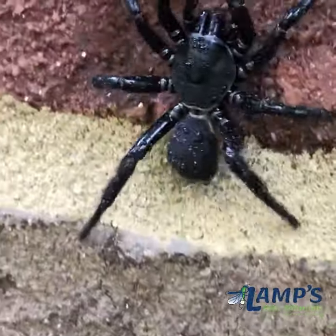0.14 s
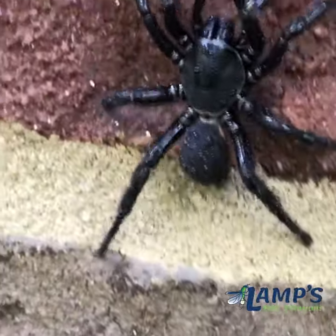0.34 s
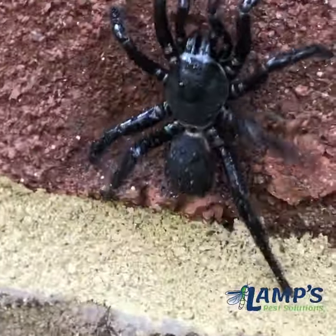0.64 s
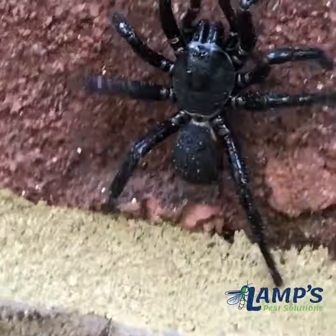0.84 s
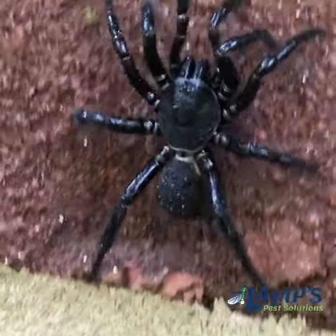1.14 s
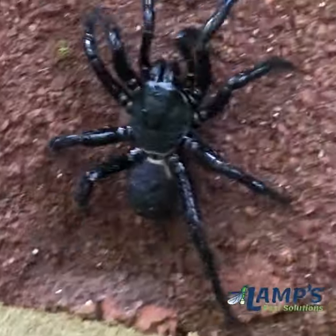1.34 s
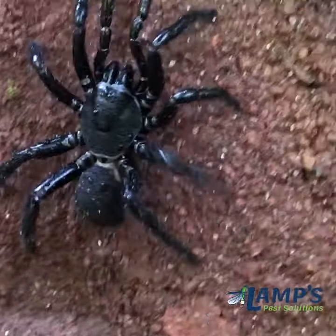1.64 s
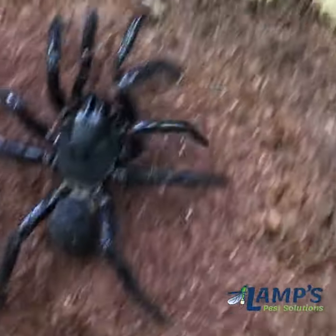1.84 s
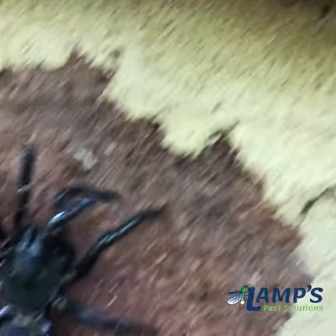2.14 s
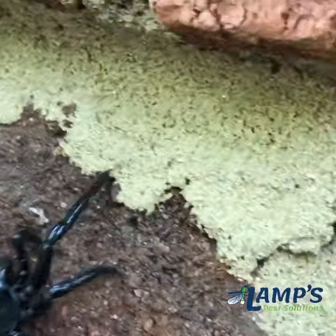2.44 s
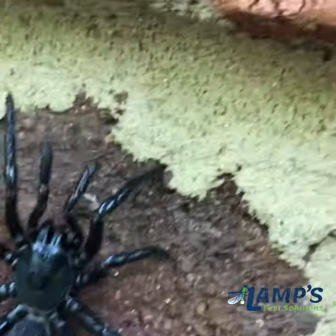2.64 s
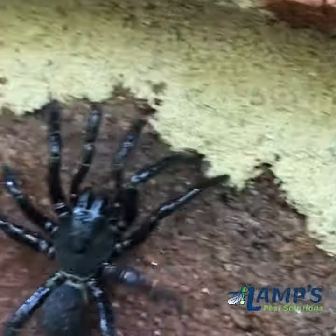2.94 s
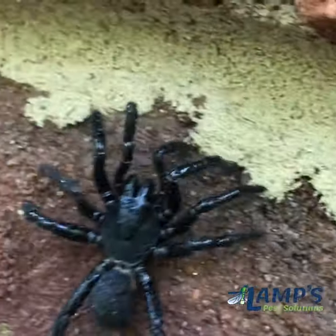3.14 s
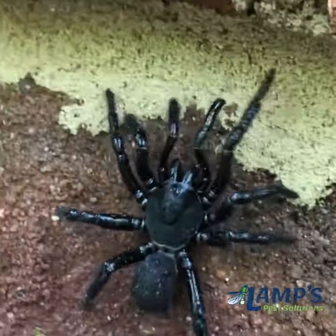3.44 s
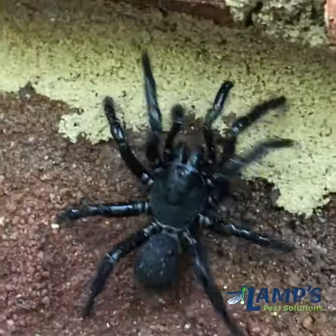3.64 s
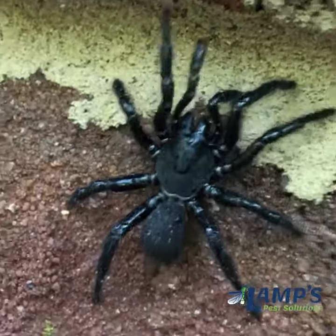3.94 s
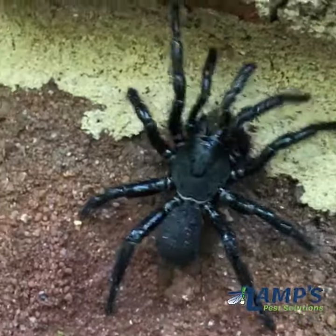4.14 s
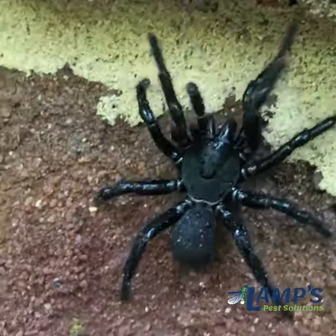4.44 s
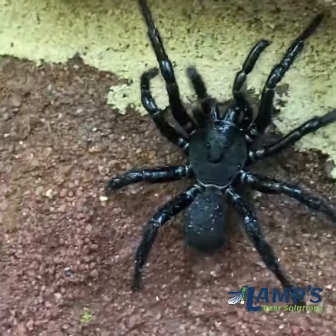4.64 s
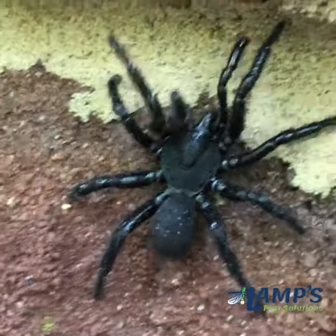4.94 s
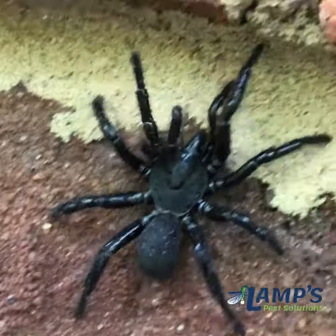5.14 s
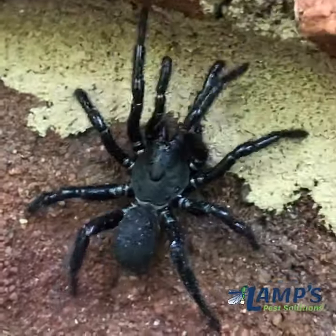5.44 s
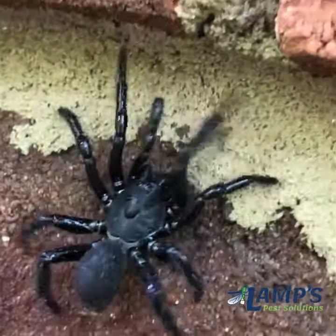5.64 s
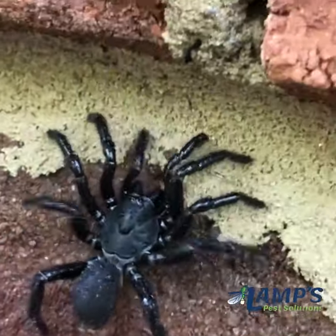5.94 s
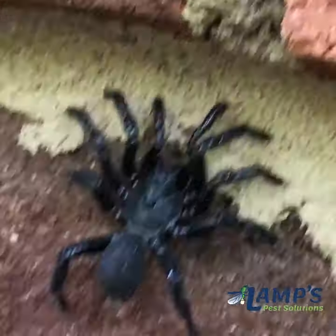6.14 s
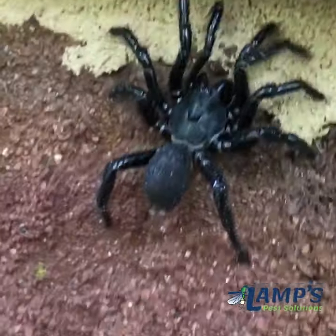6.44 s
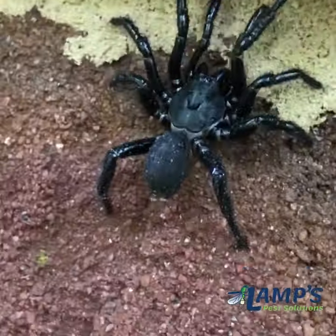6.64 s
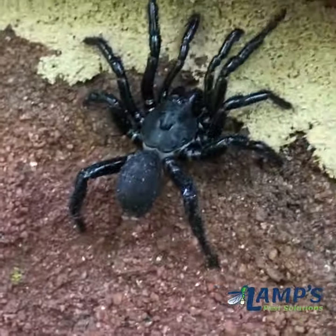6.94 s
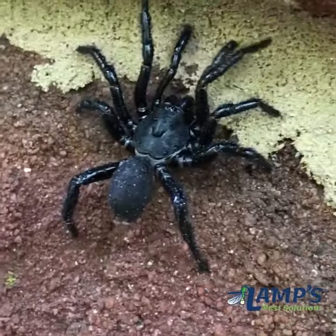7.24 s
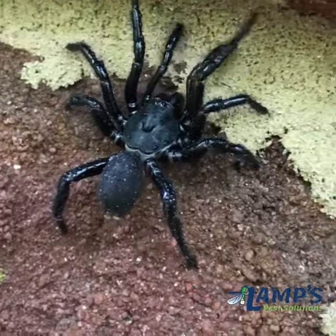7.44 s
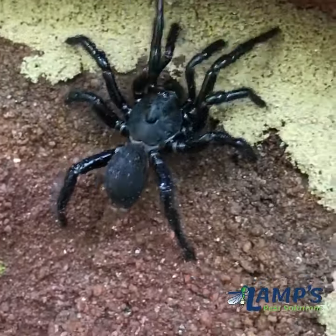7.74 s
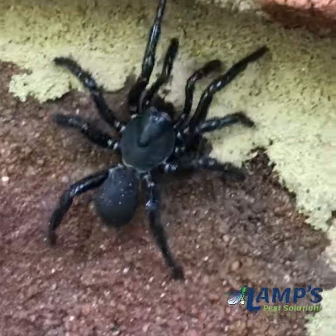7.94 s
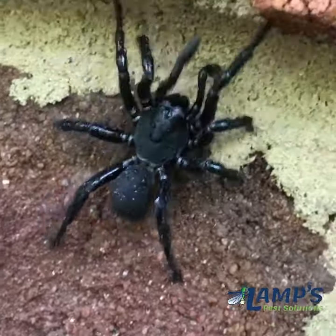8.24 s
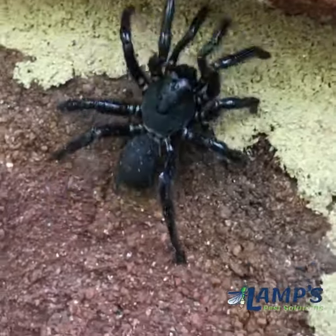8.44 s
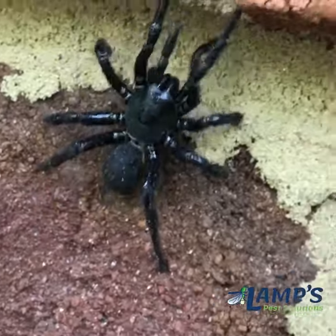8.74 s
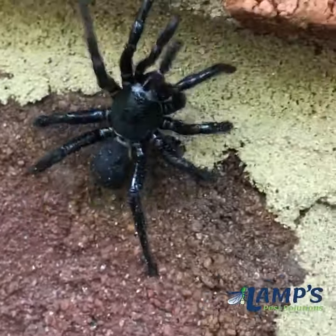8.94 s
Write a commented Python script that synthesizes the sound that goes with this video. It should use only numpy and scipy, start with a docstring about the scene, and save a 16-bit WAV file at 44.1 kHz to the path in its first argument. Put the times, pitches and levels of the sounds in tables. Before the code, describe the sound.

A low, steady engine drone is heard outdoors from beside a brick wall, coming from a vehicle on a nearby road. It is strongest in the first two seconds, with one very faint bird chirp at about 1.2 seconds. From 2 seconds, tyre noise swells as the vehicle nears, peaking between 3 and 4 seconds and ringing slightly in the space by the wall. A small bird gives a quick cluster of thin, high chirps from 3.5 to 4 seconds, and a fainter one at 4.5. At about 5 seconds the engine briefly dips as the load comes off, then continues softer and more uneven. From 6 seconds it falls steadily in pitch, fading with the tyre noise by about 9 seconds. A weaker motor hums farther off, most noticeable late on. Low road rumble and a thin outdoor hiss continue throughout.

```python
"""A motor drones some way from a brick wall outdoors, probably a vehicle on a nearby road.
Its exhaust hums at the firing rate and its multiples, then the load drops and it runs down.
Tyre noise swells as it nears, rings the space by the wall, then sinks and fades.
A weaker motor hums farther off and a small bird gives thin, high chirps over low rumble and hiss."""
import sys
import numpy as np
from scipy import signal
from scipy.fft import rfft, irfft, next_fast_len
from scipy.io import wavfile
from scipy.ndimage import uniform_filter1d, map_coordinates

SR = 44100
rng = np.random.default_rng(int(sys.argv[2]) if len(sys.argv) > 2 else 0)


def master_out(mix):
    """Clip the mix to full scale and print it as 16-bit PCM to the path in sys.argv[1]."""
    frames = np.transpose(np.atleast_2d(mix))
    ceiling = np.clip(frames, -1, 1)
    pcm = np.round(ceiling * 32767).astype(np.int16)
    wavfile.write(sys.argv[1], SR, pcm)


N = 401310

CRUISE_HZ = 85.1  # firing rate on the approach
LIFT_S, BRAKE_S = 4.95, 6.06  # load comes off, braking starts
PAST_S, PAST_TAKES_S = 4.4, 0.7  # tyres turn to be heard from behind


def exhaust(octave_early_db=-35, octave_late_db=-43.5, stumble_db=2.0, jitter_rad=0.13):
    """Firing tone and its orders: even while the motor pulls, weaker and uneven as it runs down."""
    # Each row: time in seconds, firing tone level in dB.
    firing_levels = [(0.0, -28.5), (1.85, -29.5), (2.95, -34.5), (3.4, -40), (3.9, -33), (4.91, -31.0),
                     (4.98, -51), (5.35, -37.5), (6.1, -36), (7.3, -38), (8.3, -44.5), (9.1, -55)]
    # Each row: multiple of the firing rate, base level in dB on the approach, in dB once settled.
    upper_orders = [(3, -65.5, -61), (4, -63, -58), (5, -61, -63), (6, -69.5, -74), (7, -66.5, -65.5),
                    (8, -67, -68.5), (9, -66, -74), (10, -65, -76), (11, -64, -75), (12, -64.5, -76.5)]
    (drone_db,) = curves(firing_levels)
    coasting = ramp(LIFT_S, takes_s=0.056)
    settled = ramp(1.79, takes_s=0.76)
    # overtones drop off load, return a little under braking, fade with speed
    unloaded_db = -14 * coasting + 3.5 * ramp(BRAKE_S, takes_s=0.45) - 6 * speed_halvings()
    firing_rad = phase_of(firing_hz()) + (0.048 + jitter_rad * coasting / 2) * wobble(19)
    hum = amp(drone_db + (0.28 + coasting / 2) * wobble(15)) * np.cos(firing_rad)
    octave_db = octave_early_db + (octave_late_db - octave_early_db) * settled
    octave_db += (0.5 + stumble_db * coasting) * wobble(11)
    octave_rad = 2 * firing_rad + np.pi + 2 * jitter_rad * coasting * wobble(10)
    hum += amp(octave_db + unloaded_db) * np.cos(octave_rad)
    upper_db = unloaded_db + 0.96 * (1 - coasting) * (drone_db - drone_db.max())
    for order, early_db, late_db in upper_orders:
        # open air makes each order drift in level and phase
        db = early_db + (late_db - early_db) * settled + upper_db + 2.3 * wobble(3)
        drift_rad = 0.06 * order * wobble(12) + rng.uniform(0, 2 * np.pi)
        hum += amp(db) * np.cos(order * firing_rad + drift_rad)
    return np.sqrt(2) * hum


def firing_hz(sag_hz=1.6, coast_hz_per_s=4.0, brake_hz_per_s=10.6):
    """Cruise, a slight sag in passing, a gentle coast, then steady braking."""
    t = np.arange(N) / SR
    coasted_hz = coast_hz_per_s * (np.clip(t, LIFT_S, BRAKE_S) - LIFT_S)
    braked_hz = brake_hz_per_s * np.maximum(t - BRAKE_S, 0)
    return CRUISE_HZ - sag_hz * ramp(3.0, takes_s=0.9) - coasted_hz - braked_hz


def speed_halvings():
    """How many times the speed has halved since cruise."""
    return np.log2(CRUISE_HZ / firing_hz())


def road_db(base_db, swell_db_per_db, past_db, db_per_halving):
    """Level of a road layer from nearness, direction and speed."""
    # Tyre rush, swelling as the vehicle nears. Each row: time in seconds, relative level in dB.
    rush_levels = [(0.0, -51), (0.9, -51.5), (2.05, -48.5), (2.6, -45), (3.1, -45.0), (3.35, -40.5),
                   (3.6, -47.5), (3.85, -44), (4.45, -48), (6.2, -50.5), (7.7, -53), (9.1, -60)]
    (rush_db,) = curves(rush_levels)
    swell_db = swell_db_per_db * (rush_db - rush_db.mean())
    return base_db + swell_db + past_db * ramp(PAST_S, PAST_TAKES_S) + db_per_halving * speed_halvings()


def tyre_tread(approach_hz=1510.5, past_ratio=0.88, width_hz=195):
    """Tread resonance: a noise band whose pitch falls in passing and follows the speed."""
    centre_hz = approach_hz * past_ratio ** ramp(PAST_S, PAST_TAKES_S)
    centre_hz *= (firing_hz() / CRUISE_HZ) ** 0.65
    centre_rad = phase_of(centre_hz)
    skirt = lambda hz: (1 + (hz / width_hz) ** 2) ** -0.79
    in_phase, quadrature = (filtered(rng.standard_normal(N), skirt) for _ in range(2))
    band = patchy(in_phase * np.cos(centre_rad) + quadrature * np.sin(centre_rad), depth_db=2.0)
    db = road_db(-53.5, swell_db_per_db=1.28, past_db=1, db_per_halving=3)
    far_db = -8.5 * (1 - ramp(0.9, takes_s=0.66))  # sings only once closer
    return amp(db + far_db + 0.46 * wobble(8)) * band


def tyre_rush():
    """Tyres rolling on the road: a broad roar and a higher hiss."""
    # Each row of both spectra: frequency in Hz, relative density in dB.
    roar_spectrum = [(100, -15), (250, -4), (450, -7), (620, 0.5), (1000, 1), (1500, 2), (2000, -8),
                     (2500, -13), (3100, -24.5), (3600, -18.5), (5000, -25), (8000, -33), (12000, -54)]
    hiss_spectrum = [(1200, -33), (1850, -5), (2150, 0), (2500, 4.5), (2850, -1), (3100, -3.5), (3450, -4),
                     (4100, -12), (6000, -14), (8000, -23), (11000, -55.5)]
    roar_db = road_db(-48, swell_db_per_db=0.41, past_db=-3, db_per_halving=-5)
    roar = amp(roar_db + 0.61 * wobble(7)) * patchy(noise(roar_spectrum), depth_db=1.5)
    hiss_db = road_db(-58, swell_db_per_db=0.16, past_db=-6, db_per_halving=-9)
    hiss = amp(hiss_db + 0.63 * wobble(12)) * patchy(noise(hiss_spectrum), depth_db=3.5)
    return roar + hiss


def wall_ring():
    """Road noise excites the resonances of the space by the wall."""
    # Each row: centre in Hz, half-width in Hz, relative level in dB.
    wall_modes = [(354, 54, -3.5), (545, 110, -2), (970, 70, -4.5), (2550, 150, -18), (3470, 200, -22)]
    response = lambda hz: sum(amp(db) / (1 + ((hz - centre_hz) / width_hz) ** 2)
                              for centre_hz, width_hz, db in wall_modes)
    ring_db = road_db(-59, swell_db_per_db=1.0, past_db=3.5, db_per_halving=2.5)
    return amp(ring_db) * unit(filtered(rng.standard_normal(N), response))


def far_motor():
    """A second motor farther off: one weak, wavering tone."""
    # Each row: time in seconds, pitch in Hz, level in dB.
    hum_track = [(0, 107.7, -45), (3, 110.3, -65), (5.2, 110, -52.5), (6.7, 104, -48), (8.5, 100.1, -48),
                 (9.1, 88, -63)]
    hz, db = curves(hum_track)
    return np.sqrt(2) * amp(db + 0.48 * wobble(8.1)) * np.cos(phase_of(hz) + 0.36 * wobble(6))


def bird(t60_s=0.6, echo_db=-1, direct_db=-2.0):
    """Short, raspy notes that arch up and fall back, scattered by walls and trees."""
    # Each row: start in seconds, length in seconds, start pitch in Hz, top pitch in Hz,
    # place of the top in the note (0-1), source level in dB.
    notes = [(1.168, 0.07, 6600, 7840, .95, -64.5), (3.51, .028, 14100, 14250, .5, -69),
             (3.675, .055, 7550, 8250, .55, -60), (3.79, 0.051, 6100, 6640, 0.4, -53),
             (3.896, 0.063, 5270, 5950, .45, -53.5), (4.524, .035, 7500, 8200, .6, -70)]
    song = np.zeros(N)
    rasp_hz = 115 * wobble(900)
    for start_s, length_s, start_hz, top_hz, crest, db in notes:
        progress = np.clip((np.arange(N) / SR - start_s) / length_s, 0, 1)
        hz = top_hz + (start_hz - top_hz) * (progress / crest - 1) ** 2
        envelope = np.sqrt(np.abs(np.sin(np.pi * progress)))
        song += amp(db) * envelope * np.sin(phase_of(hz + rasp_hz))
    tail_s = np.arange(SR // 2) / SR
    tail = rng.standard_normal(len(tail_s)) * amp(-60 * tail_s / t60_s)
    echo = signal.fftconvolve(song, tail / np.linalg.norm(tail))[:N]
    air_loss = lambda hz: 1 / (1 + (hz / 10000) ** 4)
    return amp(direct_db) * song + amp(echo_db) * filtered(echo, air_loss)


def background(air_db=-58.5):
    """Low road rumble under a steady, thin outdoor hiss."""
    # Each row of both spectra: frequency in Hz, relative density in dB.
    rumble_spectrum = [(20, -20.5), (30, -22.5), (40, 1), (55, -3.5), (72, 5.5), (95, 2), (125, -3.5),
                       (180, -8.5), (230, -14), (320, -24.5), (600, -61.5)]
    air_spectrum = [(200, -20), (1000, 13.5), (2500, -1.5), (4200, 0.5), (5000, -3), (5800, 1),
                    (6800, -0.5), (7800, -9), (9000, -13), (9900, -15), (10600, -20.5), (15500, -20)]
    rumble_db = road_db(-43.5, swell_db_per_db=0.12, past_db=0, db_per_halving=-5)
    return amp(rumble_db) * noise(rumble_spectrum) + amp(air_db) * noise(air_spectrum)


def patchy(x, depth_db):
    """Moving air lets single bands swell and sink briefly; output rms 1."""
    spectra = signal.stft(x, nperseg=1024)[2]
    field = uniform_filter1d(rng.standard_normal(spectra.shape), size=6, axis=0)  # across bins
    field = uniform_filter1d(field, size=16, axis=1)  # across frames
    return unit(signal.istft(spectra * amp(depth_db * unit(field)), nperseg=1024)[1][:N])


def amp(db):
    """Decibels to gain."""
    return 10 ** (np.asarray(db) / 20)


def unit(x):
    """Scale to rms 1."""
    return x / np.sqrt(np.mean(x ** 2) + 1e-20)


def curves(rows):
    """One value per sample for each column after the time."""
    times_s, *columns = np.transpose(rows)
    return [np.interp(np.arange(N) / SR, times_s, column) for column in columns]


def ramp(centre_s, takes_s):
    """Linear rise from 0 to 1."""
    return np.clip((np.arange(N) / SR - centre_s) / takes_s + 0.5, 0, 1)


def wobble(knots_per_s):
    """Smooth random curve."""
    knots = rng.standard_normal(int(N * knots_per_s / SR) + 4)
    return map_coordinates(knots, [np.arange(N) * knots_per_s / SR])


def phase_of(hz):
    """Running phase in radians."""
    return 2 * np.pi * np.cumsum(hz) / SR


def filtered(x, response):
    """Apply a gain given as a function of Hz."""
    size = next_fast_len(N + SR // 2)
    return irfft(rfft(x, size) * response(np.fft.rfftfreq(size, 1 / SR)), size)[:N]


def noise(spectrum):
    """Noise of rms 1 coloured by (Hz, dB) points."""
    points_hz, db = np.transpose(spectrum)
    response = lambda hz: amp(np.interp(np.log(hz + 1), np.log(points_hz), db))
    return unit(filtered(rng.standard_normal(N), response))


def scene():
    """All sources at one microphone by the wall."""
    mix = exhaust() + far_motor() + tyre_tread() + tyre_rush() + wall_ring() + background() + bird()
    return mix[None]


def record(dry):
    """Sharp band limit."""
    top_hz = 15780
    return filtered(dry[0], lambda hz: hz < top_hz)[None]


dry = scene()
out = record(dry)
master_out(out)
```